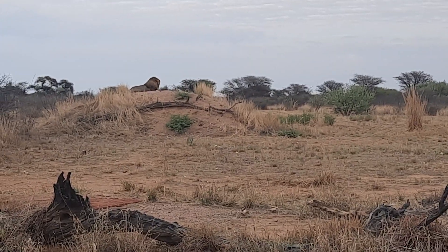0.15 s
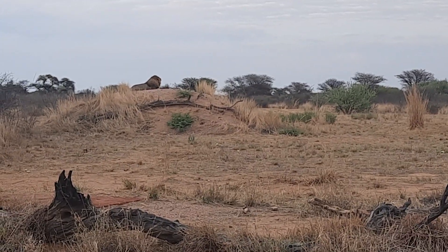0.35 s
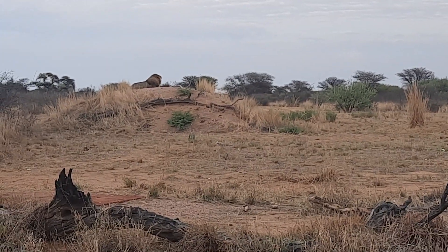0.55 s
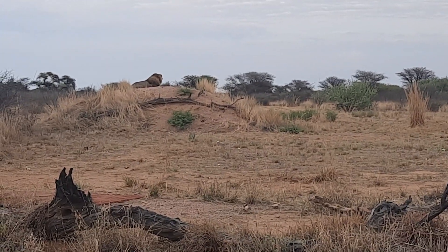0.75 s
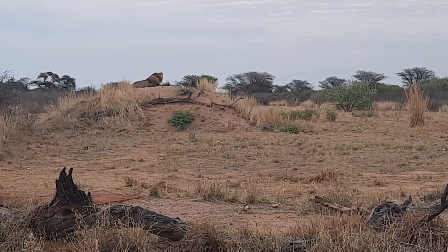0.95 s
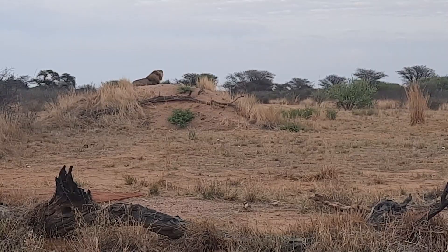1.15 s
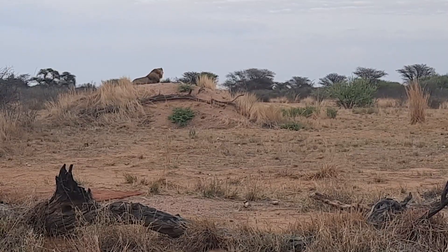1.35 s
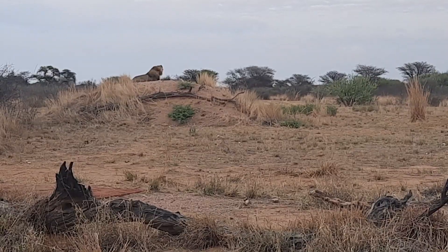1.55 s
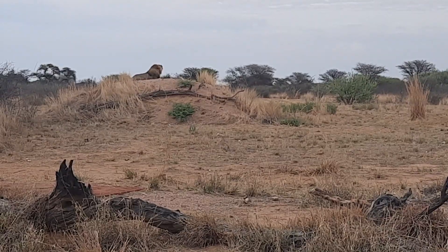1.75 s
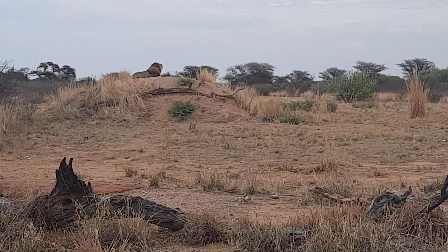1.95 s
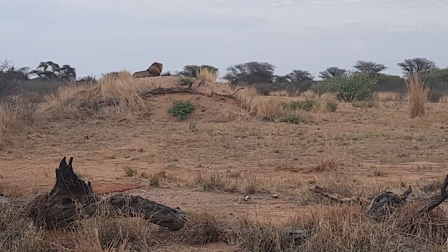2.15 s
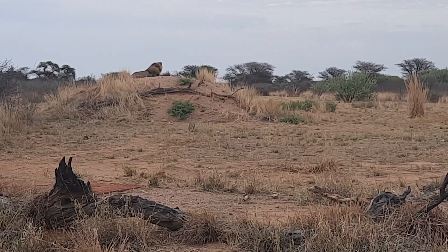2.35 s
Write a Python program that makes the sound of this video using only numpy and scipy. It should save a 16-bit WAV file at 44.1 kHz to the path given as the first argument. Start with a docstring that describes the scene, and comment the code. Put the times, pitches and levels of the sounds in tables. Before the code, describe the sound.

A lion gives three deep, rasping grunts while a second lion moans over them.

```python
"""Lions call across open dry bushland at dusk. One gives three chesty grunts: a low tone and rasping breath
that break up into a creaky growl as slow slaps of the vocal folds ring the chest. A second moans over
them on a held note, then a lower one, and far scrub echoes both. Behind them an earlier call dies away,
the air rumbles softly, a cicada clicks fast enough to buzz and a far bird whistles twice.
The scene is heard through spaced stereo microphones."""
import sys
import numpy as np
from scipy import signal
from scipy.fft import rfft, irfft, next_fast_len
from scipy.io import wavfile
from scipy.ndimage import map_coordinates

SR = 44100
rng = np.random.default_rng(int(sys.argv[2]) if len(sys.argv) > 2 else 0)


def to_wav(s):
    """Save 16-bit WAV."""
    ch = np.atleast_2d(s).T  # columns
    pcm = np.round(np.clip(ch, -1, 1) * 32767)  # PCM
    wavfile.write(sys.argv[1], SR, pcm.astype(np.int16))


N = 105840

# colour of the still air and of an earlier call's echo: (frequency [Hz], relative level [dB])
AIR_COLOUR = [(25, -34), (120, 0.5), (190, -29), (350, -21), (600, -44.5), (5000, -69.5)]
EARLIER_CALL_COLOUR = [(30, -53), (170, 0), (400, -16), (700, -25), (2500, -50.5), (6000, -78)]
# chest tone, one list per grunt: (time [s], pitch [Hz], level [dB])
GRUNT_TONES = [
    [(.16, 125.9, -41.5), (.19, 128.5, -25.5), (.255, 130.6, -16), (.3, 135.9, -12), (.39, 134.7, -13.5),
     (.43, 122.2, -26.5), (.457, 126.9, -18.5), (.5, 118.4, -34), (.545, 107.7, -20.5),
     (.583, 105.8, -43.5), (.608, 111.6, -31.5), (.645, 119, -42), (.682, 127.9, -31.5),
     (.712, 125.4, -52.5)],
    [(1.035, 122.6, -47), (1.06, 129.6, -31.5), (1.12, 133.9, -15), (1.155, 141.2, -12.5),
     (1.17, 130.3, -17.5), (1.19, 145.2, -10), (1.22, 131.1, -17), (1.25, 128.8, -24), (1.3, 122.3, -44.5),
     (1.35, 132.8, -25), (1.4, 132, -42)],
    [(1.84, 123.1, -36.5), (1.89, 126.2, -21), (1.95, 131.6, -13), (1.99, 135.5, -18.5), (2.03, 134.4, -17),
     (2.085, 117.3, -30), (2.115, 108.9, -22), (2.14, 108.3, -40.5), (2.2, 128.9, -27.5),
     (2.28, 108.4, -52.5)],
]
# overtones of each voice: (harmonic number, level against the fundamental [dB])
GRUNT_OVERTONES = [(2, -25), (3, -29)]
MOAN_OVERTONES = [(3, -33), (4, -33)]
# rasp faders, one list per grunt: (time [s], throat [dB], mouth [dB], breath hiss [dB])
GRUNT_RASP = [
    [(.15, -48, -100, -97), (.205, -44.5, -63, -74.5), (.26, -33.5, -57, -69.5), (.39, -35.5, -55, -62.5),
     (.52, -38.5, -58, -66.5), (.59, -47, -68, -74), (.7, -50.5, -77, -82), (.8, -68, -90.5, -95)],
    [(1.035, -55.5, -100, -97.5), (1.06, -48, -78, -82.5), (1.1, -37.5, -58.5, -67.5),
     (1.17, -32.5, -56.5, -66.5), (1.27, -33, -59, -70.5), (1.33, -49.5, -67.5, -74.5),
     (1.46, -41.5, -73.5, -100)],
    [(1.85, -36.5, -81.5, -87.5), (1.905, -32.5, -55, -66), (1.975, -37, -60.5, -69),
     (2.03, -35, -53, -57.5), (2.11, -36.5, -63.5, -66), (2.2, -45, -66.5, -74), (2.38, -58.5, -91.5, -95)],
]
# hardest slaps of the folds as a grunt or the low moan breaks up: (time [s], relative strength [dB])
HARD_SLAPS = [(0.476, -22.5), (0.507, -28.5), (0.535, -30.5), (0.585, -30.5), (0.609, -33), (0.649, -41),
              (0.691, -41.5), (1.223, -25.5), (1.282, -23), (1.817, -26), (2.009, -22.5), (2.076, -23),
              (2.171, -30)]
# body resonances, the last for the moaning lion: (centre [Hz], nominal width [Hz], nominal gain [dB])
CHEST_MODES = [(75.3, 20, 2), (118, 60, 6), (231.5, 180, -3.5), (364, 60, 3.5)]
THROAT_FORMANTS = [(243, 52, -1.5), (339.6, 75, 2.5), (469, 110, -5.5)]
PALATE_FORMANTS = [(534, 64, -4), (662, 38, 1.5), (840, 170, -7.5), (969, 41, -1.5), (1110, 210, -8)]
MOUTH_FORMANTS = [(1841, 220, 1), (2270, 130, 2), (2478, 54, 3.5), (2920, 540, -2)]
MOAN_FORMANTS = [(1940, 230, 0.5), (3060, 400, 2), (4340, 220, -5.5), (5500, 1900, -9.5)]
# breath hiss, turbulence under the grunt, throat rasp of the moan: (frequency [Hz], relative level [dB])
HISS_COLOUR = [(3000, -26), (4150, -10), (5000, -6), (6900, -3), (8000, -14), (10500, -17.5), (15500, -33)]
RUMBLE_COLOUR = [(20, -51), (70, -15), (110, -0.5), (230, -10), (300, -71)]
MOAN_THROAT_COLOUR = [(40, -45), (110, -1), (300, 3), (465, -4.5), (900, -12.5), (1070, -11.5),
                      (1500, -26.5), (2340, -31), (3700, -51), (9500, -71.5)]
# reverb tail of the scrub: (frequency [Hz], time to fall 60 dB [s])
ECHO_DECAY = [(130, 1.1), (400, 1.8), (1000, 0.39), (3000, 0.1)]
# bird whistles: (start [s], length [s], start pitch [Hz], end pitch [Hz], level [dB])
WHISTLES = [(.78, .12, 3730, 3650, -91), (.92, .14, 3400, 3560, -87)]
# high moan: (time [s], pitch [Hz], level [dB], level of the octave [dB])
HIGH_MOAN = [(1.21, 185.6, -34, -30), (1.27, 196.1, -17.5, -35.5), (1.42, 195.6, -18, -44),
             (1.46, 195.5, -17.5, -28), (1.54, 193, -16.5, -27), (1.565, 188.6, -29, -35),
             (1.6, 200.4, -23, -28), (1.68, 197.2, -38.5, -32.5), (1.74, 194.6, -30, -35),
             (1.84, 199, -33.5, -37)]
# low moan: (time [s], pitch [Hz], level [dB])
LOW_MOAN = [(1.56, 165.9, -29), (1.61, 167.2, -18), (1.665, 170.4, -13.5), (1.72, 166.7, -15.5),
            (1.76, 158.3, -36), (1.79, 154.4, -23.5), (1.82, 167.6, -26), (1.87, 160.7, -25)]
# rasp faders of the moans: (time [s], throat [dB], mouth [dB])
MOAN_RASP = [(1.239, -36.5, -63.5), (1.4, -35, -69), (1.549, -34.5, -61.5), (1.689, -32.5, -62.5),
             (1.76, -32.5, -58), (1.84, -40, -65.5), (1.902, -53.5, -71.5)]
# stereo balance of the lions: (frequency [Hz], left minus right [dB])
BALANCE = [(150, 0.5), (300, 3.5), (1200, 2), (2800, 1), (5500, -4), (15000, -10)]
# how alike the noise is left and right: (frequency [Hz], correlation [0-1])
STEREO_LIKENESS = [(200, 0.88), (1400, 0.52), (4000, 0.14), (12000, 0.13)]

AIR_DB, MIC_HISS_DB, TOP_HZ = -57, -85, 15700
EARLIER_CALL_DB, EARLIER_CALL_T60_S = -46.5, .84
CICADA_DB, CICADA_CLICK_HZ, CICADA_RING_HZ, CICADA_WIDTH_HZ = -77.5, 430, 7200, 850
PITCH_WAVER, TONE_WAVER_DB, FRAY_BELOW_DB, FRAY_PER_DB = .006, .5, -21, 1.6
CHOP_HZ, CHOP_DEPTH, FLUTTER_DB = 130, .3, 1.8
SMALL_SLAP_HZ, SMALL_SLAP_GAIN_DB, HARD_SLAP_GAIN_DB, SLAP_SOFT_HZ = 48.23, -15, 45.5, 450
PALATE_GAIN_DB, RUMBLE_GAIN_DB, MOAN_DARK_HZ = 8, -1, 8800
ECHO_GAIN_DB, ECHO_DELAY_S = -32, .07
GRUNT_LAG_S, MOAN_LAG_S, LAG_FROM_HZ = .0004, -.00014, 120  # positive lag: the left side hears it later


def amp(db):
    """Decibels to amplitude."""
    return 10 ** (np.asarray(db) / 20)


def unit(x):
    """x scaled to rms 1."""
    return x / np.sqrt(np.mean(x ** 2) + 1e-20)


def along(points, hz):
    """Read (frequency [Hz], value) points on a log frequency axis."""
    freqs, values = np.transpose(points)
    return np.interp(np.log(hz + 1), np.log(freqs + 1), values)


def curves(rows):
    """One automation curve for each column after the time."""
    times, *columns = np.transpose(rows)
    return [np.interp(np.arange(N) / SR, times, column) for column in columns]


def wobble(rate):
    """A smooth random curve, rate knots a second."""
    return map_coordinates(rng.standard_normal(int(N * rate / SR) + 4), [np.arange(N) * rate / SR])


def fade(start, end):
    """A gate open between two times, with 20 ms ramps."""
    t = np.arange(N) / SR
    return np.clip(np.minimum(t - start, end - t) / .02, 0, 1)


def filtered(x, response):
    """x through a complex frequency response."""
    size = next_fast_len(N + SR // 2)
    return irfft(rfft(x, size) * response(np.fft.rfftfreq(size, 1 / SR)), size)[..., :N]


def eq(points):
    """An EQ curve through (frequency [Hz], level [dB]) points."""
    return lambda hz: amp(along(points, hz))


def resonances(rows):
    """The response of parallel resonators with alternating polarity."""
    return lambda hz: sum((-1) ** k * amp(db) * 1j * hz * width / (centre**2 - hz**2 + 1j * hz * width)
                          for k, (centre, width, db) in enumerate(rows))


def noise(colour, gate=1):
    """Gated, then coloured stereo noise: mid at rms 1, narrow in the bass and wide in the treble."""
    spread = lambda hz: np.arccos(np.clip(along(STEREO_LIKENESS, hz), 0, 1)) / 2
    white = gate * rng.standard_normal((2, N))
    mid, side = filtered(white, lambda hz: colour(hz) * [np.cos(spread(hz)), np.sin(spread(hz))])
    return np.array([mid + side, mid - side]) / np.sqrt(np.mean(mid ** 2))


def still_air():
    """A soft, low bed of air with faint microphone hiss."""
    return amp(AIR_DB) * noise(eq(AIR_COLOUR)) + amp(MIC_HISS_DB) * rng.standard_normal((2, N))


def earlier_call():
    """The echo of an earlier call, dying away as dark noise."""
    decay_db = 60 * np.arange(N) / SR / EARLIER_CALL_T60_S
    return amp(EARLIER_CALL_DB - decay_db) * noise(eq(EARLIER_CALL_COLOUR))


def cicada():
    """Fast, uneven clicks blur into a buzz in one broad resonance."""
    cycles = np.cumsum(CICADA_CLICK_HZ * (1 + .008 * wobble(400))) / SR
    clicks = amp(3 * wobble(400)) * sum(np.cos(2 * np.pi * k * cycles) for k in range(15, 21))
    buzz = unit(filtered(clicks, lambda hz: np.exp(-((hz - CICADA_RING_HZ) / CICADA_WIDTH_HZ) ** 2)))
    return amp(CICADA_DB + 1.1 * wobble(24)) * np.array([buzz, np.roll(buzz, 6)])


def breath():
    """Air flow chopped by the folds at an unsteady rate, fluttering slowly."""
    chop_hz = CHOP_HZ * np.exp(.18 * wobble(30))
    chop = 1 + CHOP_DEPTH * np.sin(2 * np.pi * np.cumsum(chop_hz) / SR)
    return unit(chop * amp(FLUTTER_DB * wobble(22)))


def rasp(formants):
    """Chopped breath through resonances with steepened skirts."""
    tract = resonances(formants)
    return noise(lambda hz: tract(hz) * np.abs(tract(hz)) ** .5, breath())


def creak(throat):
    """Slaps of the folds ring the chest: a few hard ones, and small ones riding the throat fader."""
    slap_hz = SMALL_SLAP_HZ * np.exp(.35 * wobble(25))
    ticks = np.diff(np.floor(np.cumsum(slap_hz) / SR), prepend=0)
    small = ticks * amp(4 * rng.standard_normal(N))
    hard = np.zeros(N)
    for time, db in HARD_SLAPS:
        hard[round(time * SR)] = amp(db + HARD_SLAP_GAIN_DB)
    chest = lambda hz: resonances(CHEST_MODES)(hz) / (1 + 1j * hz / SLAP_SOFT_HZ) ** 2
    return filtered(hard, chest) + throat * amp(SMALL_SLAP_GAIN_DB) * unit(filtered(small, chest))


def voiced_tone(rows, overtones):
    """A nearly pure sung tone; unless it has an octave column, its pitch frays where it weakens."""
    hz, db, *octave_db = curves(rows)
    fray_db = 0 if octave_db else np.clip(FRAY_PER_DB * (FRAY_BELOW_DB - db), 0, 20)
    phase = 2 * np.pi * np.cumsum(hz * (1 + PITCH_WAVER * amp(fray_db) * wobble(45))) / SR
    upper = sum(amp(level + 2.8 * wobble(23)) * np.sin(k * phase) for k, level in overtones)
    octave = sum(amp(level + .8 * wobble(30.04)) * np.sin(2 * phase + 1) for level in octave_db)
    tone = amp(db) * (np.sin(phase) + upper) + octave
    return np.sqrt(2) * fade(rows[0][0], rows[-1][0]) * amp(TONE_WAVER_DB * wobble(40)) * tone


def grunts():
    """The first lion: chest tone, creak, rasp through throat and mouth, and low turbulence beneath."""
    throat, mouth, hiss = sum(fade(rows[0][0], rows[-1][0]) * amp(curves(rows)) for rows in GRUNT_RASP)
    palate = amp(PALATE_GAIN_DB) * mouth ** .71 * throat ** .32  # opens with the mouth
    growl = creak(throat)  # also carries the one slap in the low moan
    grit = throat * rasp(THROAT_FORMANTS) + palate * rasp(PALATE_FORMANTS) + mouth * rasp(MOUTH_FORMANTS)
    exhale = hiss * noise(eq(HISS_COLOUR), breath())
    tone = sum(voiced_tone(rows, GRUNT_OVERTONES) for rows in GRUNT_TONES)
    rumble = throat * amp(RUMBLE_GAIN_DB) * unit(noise(eq(RUMBLE_COLOUR))[0])
    return tone + growl + grit + exhale + rumble


def scrub_echo(calls):
    """Scrub and far slopes answer, each frequency dying at its own speed."""
    hz, t, bands = signal.stft(rng.standard_normal((2, SR)), SR, nperseg=1024)
    bands[1] = np.where(hz[:, None] < 300, bands[0], bands[1])  # mono bass
    decay = amp(-60 * t / along(ECHO_DECAY, hz)[:, None])
    tail = signal.istft(bands * decay, SR, nperseg=1024)[1]
    send = np.pad(calls.mean(0), (round(ECHO_DELAY_S * SR), 0))
    return signal.fftconvolve(send[None], tail / np.linalg.norm(tail[0]), axes=1)[:, :N]


def bird():
    """Two far, thin, slightly blurred whistles, one falling and one rising."""
    song = np.zeros(N)
    for start, length, start_hz, end_hz, db in WHISTLES:
        level = amp(db + 6.8 * wobble(51)) * fade(start, start + length)
        glide_hz = np.interp(np.arange(N) / SR, [start, start + length], [start_hz, end_hz])
        song += level * np.sin(2 * np.pi * np.cumsum(glide_hz + 40 * wobble(120)) / SR)
    return song


def moans():
    """The second lion: a held note, then a lower one, over a duller rasp of breath."""
    throat, mouth = fade(MOAN_RASP[0][0], MOAN_RASP[-1][0]) * amp(curves(MOAN_RASP))
    mouth_colour = lambda hz: resonances(MOAN_FORMANTS)(hz) * np.exp(-(hz / MOAN_DARK_HZ) ** 4)
    mouth_rasp = mouth * noise(mouth_colour, breath())
    notes = voiced_tone(HIGH_MOAN, MOAN_OVERTONES) + voiced_tone(LOW_MOAN, MOAN_OVERTONES)
    return notes + throat * noise(eq(MOAN_THROAT_COLOUR), breath()) + mouth_rasp


def spaced_pair(source, lag_s):
    """A source reaches two microphones apart in level and time; the deepest bass arrives together."""
    def response(hz):
        half_phase = np.pi * hz * lag_s * hz / np.hypot(hz, LAG_FROM_HZ)
        return [amp(side * along(BALANCE, hz) / 2) * np.exp(-1j * side * half_phase) for side in (1, -1)]
    return filtered(source, response)


def scene():
    """Both lions and their echo, mixed over the dusk ambience."""
    grunting, moaning = grunts(), moans()
    bed = still_air()
    lions = spaced_pair(grunting + earlier_call(), GRUNT_LAG_S) + spaced_pair(moaning, MOAN_LAG_S)
    echo = amp(ECHO_GAIN_DB) * scrub_echo(grunting + moaning)
    return lions + echo + cicada() + bird() + bed


def record(dry):
    """A brick-wall low-pass takes off the very top."""
    return filtered(dry, lambda hz: hz < TOP_HZ)


dry = scene()
out = record(dry)
to_wav(out)
```